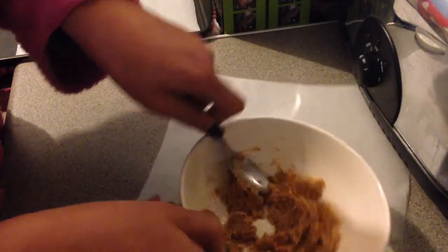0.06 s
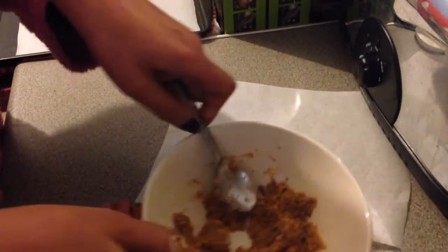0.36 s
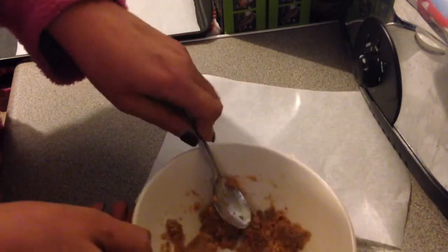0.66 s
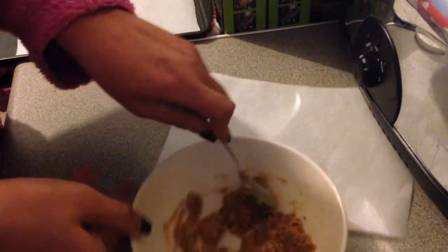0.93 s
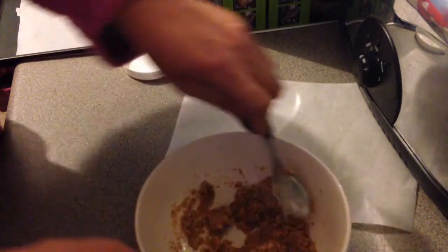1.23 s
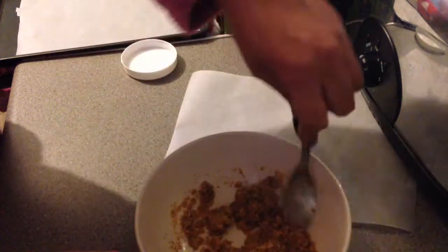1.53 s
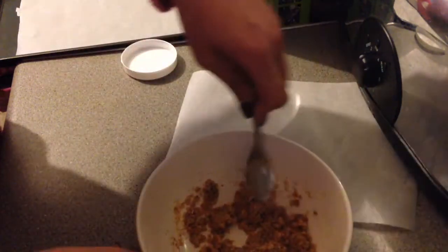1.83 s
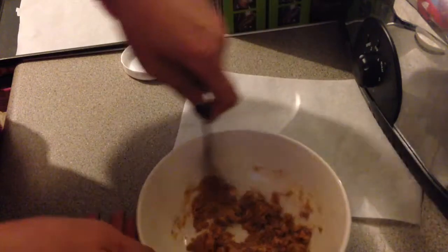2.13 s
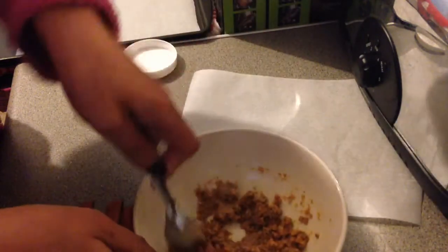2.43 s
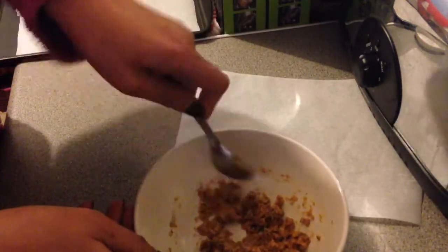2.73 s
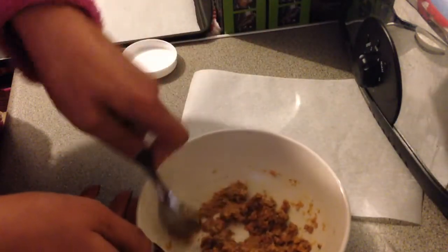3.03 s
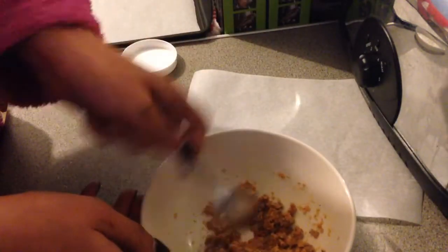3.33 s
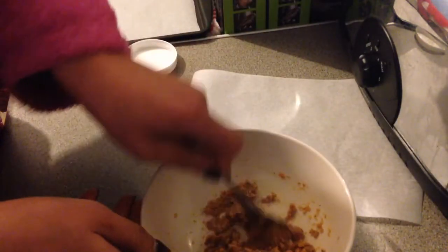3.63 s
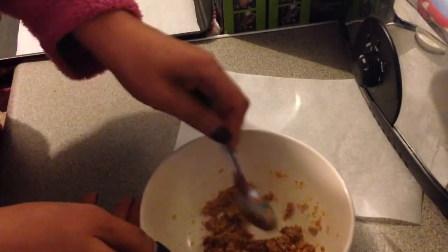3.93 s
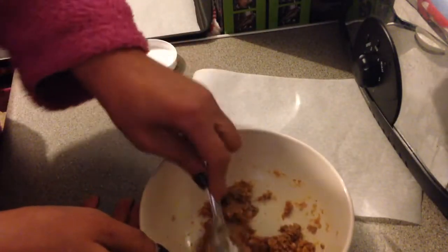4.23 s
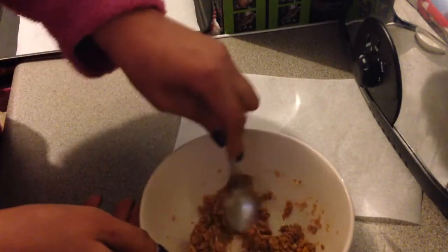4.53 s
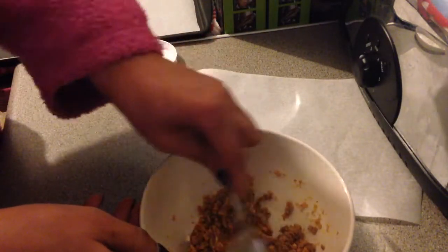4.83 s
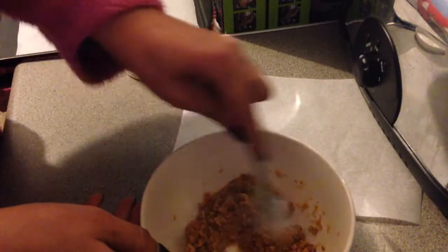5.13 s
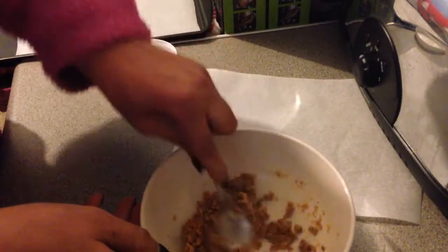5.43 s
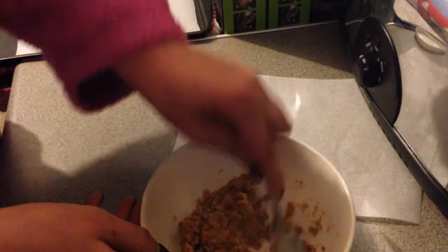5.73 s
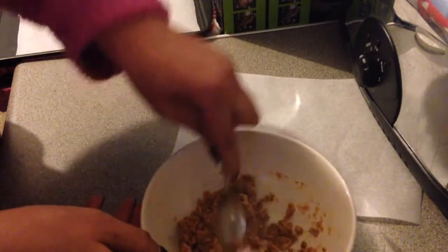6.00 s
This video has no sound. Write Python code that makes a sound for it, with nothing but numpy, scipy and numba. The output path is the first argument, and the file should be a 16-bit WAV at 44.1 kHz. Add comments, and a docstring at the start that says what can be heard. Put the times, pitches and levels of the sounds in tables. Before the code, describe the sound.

A metal spoon scrapes and clinks through thick paste in a ceramic bowl, which bumps and drags on a counter.

```python
"""Spoon mixing in a ceramic bowl

A metal spoon works a thick, crumbly mixture in a bowl on baking paper on a kitchen counter. Hits on the
wall ring spoon and bowl; stick-slip on the glaze scrapes and squeaks; the paste smears and crackles.
Shifted by hand, the bowl bumps and drags, shaking the counter. Small room, faint appliance hum, close by.
"""
import sys
import numpy as np
from scipy import signal
from scipy.fft import rfft, irfft
from scipy.io import wavfile
from scipy.ndimage import uniform_filter1d
from numba import njit

SR = 44100
rng = np.random.default_rng(int(sys.argv[2]) if len(sys.argv) > 2 else 0)


def int16_out(signal):
    """Quantize to a 16-bit WAV file."""
    q = np.round(np.clip(np.atleast_2d(signal).T, -1, 1) * 32767)
    wavfile.write(sys.argv[1], SR, q.astype(np.int16))


N = 276066
TIME = np.arange(N) / SR
RING_TIME = TIME[:SR // 3]
TOP_HZ = 15400

# bowl modes: f/Hz, level/dB, t60/s
BOWL_MODES = [(938, -3, 0.12), (2017, -8, 0.096), (2880, -20, 0.083), (3530, 1.5, 0.081), (5420, 1, 0.082),
              (5780, -13.5, 0.16), (7485, -7.5, 0.052), (9570, -4.5, 0.067), (11930, -17, 0.079),
              (14800, -13, 0.065)]
# modes of the spoon, damped against the wall: f/Hz, level/dB, t60/s
SPOON_MODES = [(1500, -20, .015), (1881, 1, 0.0075), (2324, -10, 0.038), (4160, 6, 0.02), (4660, -2, .015),
               (5400, 2.5, 0.04), (7390, -2, 0.031), (9690, -3.5, .03), (10400, -3.5, 0.027),
               (11000, -4.5, .03), (11940, -4.5, 0.019), (13500, -13.5, .03)]
# counter modes: f/Hz, level/dB, t60/s
COUNTER_MODES = [(123.2, -9.5, 0.16), (145.5, 0.5, 0.074), (193, 0.5, 0.027), (218, -9.5, 0.025),
                 (298.7, -9, 0.06), (378, -13.5, 0.17), (506, -12, 0.12), (650, -9, .05), (874, -10, 0.027)]
# spoon hits on the wall: t/s, level/dB, counter thump/dB, bowl ring/dB, rim extra/dB, spoon ring/dB,
# then 4 x tone/dB, low to high
WALL_HITS = [(1.5774, -31.5, -56, -1, -2.5, -2.5, 8.5, -4.8, -6, -11),
             (2.8310, -18.5, -42, -5.5, -1.5, 4, -3, 1.5, -4, 6.5),
             (3.552, -23, -45.5, -26.5, 12, -7.5, 1, -6, 4.5, -22),
             (4.1652, -25, -35.5, -6.5, -12.5, -5.5, -0.5, -0.35, 6.5, 3.5),
             (5.804, -30.5, -39, -2, -16.5, -2.5, 0, -5.4, -6, -14)]
# spectrum of the bowl's foot on paper: f/Hz, level/dB
RUB_SPECTRUM = [(80, -34), (250, -14), (330, 9.5), (600, -1.5), (950, -1), (1400, -12), (2200, -21),
                (4000, -53.5)]
# spectrum of paste friction: f/Hz, level/dB
PASTE_SPECTRUM = [(300, -12.5), (1400, 6), (2800, -1.5), (5400, 6.5), (6600, -1), (8000, 4), (15000, -2)]


def undb(db):
    return 10 ** (np.asarray(db) / 20)


def unit(x):
    return x / np.sqrt(np.mean(x ** 2))


def fade(t60_s):
    return np.exp(-np.log(1000) * RING_TIME / t60_s)


def ring_noise():
    return rng.standard_normal(len(RING_TIME))


def add(out, start_s, x):
    i = max(int(start_s * SR), 0)
    out[i:i + len(x)] += x[:N - i]


def colour(x, points):
    """Minimum-phase filter through (f/Hz, gain/dB) points."""
    size = 4096
    hz, db = np.transpose(points)
    bins_hz = np.arange(size // 2 + 1) * SR / size
    gain = undb(np.interp(np.log(bins_hz + 1), np.log(hz), db))
    cepstrum = irfft(np.log(gain))
    cepstrum[1:size // 2] *= 2
    cepstrum[size // 2 + 1:] = 0
    return signal.fftconvolve(x, irfft(np.exp(rfft(cepstrum))))[:len(x)]


@njit
def svf(x, hz, width_hz):
    """Band-pass with a moving centre, gain 1 there."""
    y, mid, low = np.empty(len(x)), 0., 0.
    for i in range(len(x)):
        g, damping = np.tan(np.pi * hz[i] / SR), width_hz / hz[i]
        v = (mid + g * (x[i] - low)) / (1 + g * (g + damping))
        mid, low, y[i] = 2 * v - mid, low + 2 * g * v, damping * v
    return y


def band(x, hz, width_hz):
    return svf(x, hz + np.zeros(len(x)), float(width_hz))


def ring(modes):
    """Free decay of modes."""
    return sum(undb(db) * fade(t60_s) * np.sin(2 * np.pi * hz * RING_TIME) for hz, db, t60_s in modes)


def walk(rate_hz):
    """Random levels joined by ramps, spread near 1."""
    return 1.2 * np.interp(TIME * rate_hz, np.arange(2000), rng.standard_normal(2000))


def grains(rate_hz, spread_db=0):
    """Tiny slips of uneven size at random times."""
    impulses = (rng.random(N) < rate_hz / SR) * rng.standard_normal(N)
    return unit(impulses * undb(spread_db * np.minimum(rng.exponential(size=N), 4)))


def stroke(start_s, length_s, attack_s, release_s):
    """Gain of one movement: attack, hold, release."""
    ramp = np.minimum((TIME - start_s) / attack_s, (start_s + length_s - TIME) / release_s)
    return np.sin(np.pi / 2 * np.clip(ramp, 0, 1)) ** 2


def background(air_db=-62.5, waver=0.001):
    """Room air and the slightly wavering hum of an appliance."""
    # hum lines: f/Hz, level/dB
    hum_lines = [(48.4, -78), (538.5, -78), (1911, -79)]
    # room air: f/Hz, level/dB
    air_spectrum = [(15, -45.5), (25, -12), (55, -2.5), (91, -13.5), (144, 2), (178, -6.5), (253, -10),
                    (495, -12), (537, -15), (804, -22), (1490, -22), (1850, -20.5), (2920, -21.5),
                    (14300, -23), (15500, -26)]
    warped_s = np.cumsum(1 + waver * walk(13)) / SR
    hum = sum(undb(db) * np.sqrt(2) * np.sin(2 * np.pi * hz * warped_s) for hz, db in hum_lines)
    return hum + undb(air_db) * unit(colour(rng.standard_normal(N), air_spectrum))


def kitchen(x, wet_db=-16, t60_s=0.23, gap_s=0.0073):
    """Adds the short diffuse tail of cupboards and walls."""
    tail = ring_noise() * fade(t60_s) * (RING_TIME > gap_s)
    tail = colour(tail / np.linalg.norm(tail), [(150, 11.5), (1000, 2.5), (5000, 0.5), (14000, -9.5)])
    return x + undb(wet_db) * signal.fftconvolve(x, tail)[:N]


def drags(judder_db=-2, judder_band_hz=(105, 260), rub_db=-38, drone_db=-32.5, drone_hz=141):
    """The bowl's foot judders over the paper and shakes the counter; slow slides mostly drone."""
    # shoves of the bowl: peak t/s, level/dB, rise/(dB/s), fall/(dB/s)
    shoves = [(.05, -35, 382, 119), (.66, -36.5, 260, 89), (.725, -20.5, 796, 300.5),
              (.995, -28.5, 240.5, 206), (2.04, -31, 123.5, 85), (2.305, -40.5, 300, 249.5),
              (3.28, -44.5, 216, 242), (5.835, -42, 697.5, 274)]
    gain = sum(undb(db - np.maximum(rise * (peak_s - TIME), fall * (TIME - peak_s)))
               for peak_s, db, rise, fall in shoves)
    speed = gain / gain.max()
    judder = signal.fftconvolve(grains(1200), ring(COUNTER_MODES))[:N]
    judder = unit(signal.lfilter(*signal.butter(1, judder_band_hz, "bandpass", fs=SR), judder))
    rub = unit(colour(grains(600, spread_db=2.5), RUB_SPECTRUM))
    drone = band(rng.standard_normal(N), drone_hz, width_hz=22)
    drone = unit(band(drone, drone_hz, width_hz=44))
    return (undb(judder_db) * gain * judder + undb(rub_db) * speed ** 0.82 * rub
            + undb(drone_db) * speed ** 0.74 * drone)


def thud(corner_hz, knock_db, knock_t60_s=0.055, contact_s=0.0002):
    """The foot thumps the counter through the paper; a soft landing leaves only the lowest modes."""
    knock = undb(knock_db) * fade(knock_t60_s) * unit(colour(ring_noise(), RUB_SPECTRUM))
    impact = (ring(COUNTER_MODES) + knock) * (1 - np.exp(-RING_TIME / contact_s))
    return signal.lfilter(*signal.butter(2, corner_hz, fs=SR), impact)


def bumps(rock_s=0.0225, rock_db=-16):
    """The bowl lands and rocks back, each rock weaker and duller; each clink also knocks it on the counter."""
    # landings and later rock-backs of the bowl: t/s, level/dB, low-pass corner/Hz
    impacts = [(0.054, -33, 483), (0.084, -26, 287), (0.6101, -8.5, 1250), (0.704, -13, 1010),
               (.750, -25.5, 300), (.923, -28, 990), (.956, -39, 1200), (.984, -24, 950),
               (1.942, -30, 160), (2.0201, -27.5, 1190), (2.167, -35.5, 250), (2.296, -32.5, 170),
               (3.000, -44, 200), (3.043, -42.5, 196), (4.635, -44.5, 259), (4.879, -44.5, 497),
               (4.945, -47, 300), (5.106, -44.5, 277)]
    out = np.zeros(N)
    for start_s, db, corner_hz in impacts:
        add(out, start_s, undb(db) * thud(corner_hz, knock_db=-10))
        add(out, start_s + rock_s, undb(db + rock_db) * thud(0.55 * corner_hz, knock_db=-19.5))
    for start_s, _, thump_db, *_ in WALL_HITS:
        add(out, start_s, undb(thump_db) * thud(corner_hz=1800, knock_db=-4))
    return out


def smears(patchy_db=2, smack_db=-9, smack_t60_s=0.017):
    """Paste and paper swish and crackle, with stray smacks as crumbs let go."""
    # swishes: t/s, length/s, level/dB
    swishes = [(0, 0.24, -51.5), (0.672, 0.22, -63.5), (0.928, 0.25, -60.5), (3.594, 0.17, -64),
               (3.798, 0.085, -64), (4.477, 0.082, -60), (4.842, 0.25, -67.5), (5.251, 0.32, -67),
               (5.496, 0.078, -56.5), (5.823, 0.11, -56), (5.9, 0.31, -68.5)]
    gain = sum(undb(db) * stroke(start_s, length_s, attack_s=0.019, release_s=0.59 * length_s)
               for start_s, length_s, db in swishes)
    swish = grains(3000) * undb(patchy_db * walk(56))
    smacks = signal.fftconvolve(grains(40, spread_db=-5), ring_noise() * fade(smack_t60_s))[:N]
    return gain * unit(colour(swish + undb(smack_db) * unit(smacks), PASTE_SPECTRUM))


def squeaks(scatter_cycles=0.075, third_db=-9, flutter=0.34, rim_hz=3600, lock_width_hz=250):
    """Uneven stick-slip cycles: a rough pitch, steadier when it locks to the rim's ring."""
    # an edge catches (low: foot on paper, high: spoon on glaze):
    # t/s, length/s, start f/Hz, end f/Hz, level/dB, overtone/dB
    catches = [(0.023, 0.055, 318.5, 297, -40.5, -39), (0.935, 0.12, 289.2, 336.4, -39, -25),
               (1.98, 0.15, 299.8, 325, -43, -17), (1.594, 0.033, 8600, 8100, -56, -20),
               (1.717, 0.068, 5400, 5500, -61, -10), (2.095, 0.049, 3610, 3565, -53, -23),
               (2.114, 0.26, 5580, 5440, -57.5, -13), (2.363, 0.12, 4070, 4330, -51.5, -8),
               (2.49, 0.065, 4270, 3730, -50.5, -9), (2.84, 0.038, 2540, 2785, -37.5, -3.5),
               (2.954, 0.049, 3576, 3555, -46.5, -13), (3.138, 0.061, 3715, 3530, -46, -18),
               (3.221, 0.03, 2915, 2760, -50, -4), (3.64, 0.08, 8150, 8000, -60.5, -17),
               (5.536, 0.029, 5500, 5470, -59, -15.5), (5.832, 0.081, 5730, 5550, -68, -12)]
    out = np.zeros(N)
    for start_s, length_s, start_hz, end_hz, db, overtone_db in catches:
        n = int(length_s * SR)
        lock = 0.65 * np.exp(-((end_hz - rim_hz) / lock_width_hz) ** 2)
        cycles = np.cumsum(np.linspace(start_hz, end_hz, n)) / SR
        drift = np.interp(cycles, np.arange(1000), np.cumsum(rng.standard_normal(1000)))
        phase = 2 * np.pi * (cycles + scatter_cycles * (1 - lock) * drift)
        partials = enumerate([0, overtone_db, overtone_db + third_db], 1)
        tone = sum(undb(part_db) * np.sin(k * phase) for k, part_db in partials if k * start_hz < TOP_HZ)
        grip = 1 + flutter * unit(uniform_filter1d(rng.standard_normal(n), size=100))
        add(out, start_s, undb(db) * unit(tone * grip * signal.windows.tukey(n, 0.4)))
    return out


def wandering(slips, modes, patchy_db, drift):
    """Resonances swell, fade and detune as the contact point travels."""
    out = np.zeros(N)
    for k, (hz, width_hz, db) in enumerate(modes):
        gain = undb(db + patchy_db * walk(29))
        out += (-1) ** k * gain * band(slips, hz * (1 + drift * walk(28)), width_hz)
    return unit(out)


def scrapes(body_db=-3, grit_db=-2, hiss_db=-7, chatter_db=3, unsteady_db=1.47, grit_top_hz=11000):
    """Slips on the glaze drive the bowl and a spoon resonance that moves with the contact point."""
    # sweeps along the wall: t/s, length/s, level/dB, slope/(dB/s), treble/dB, spoon start f/Hz, end f/Hz
    sweeps = [(1.705, 0.22, -60, 16, -63, 2140, 2060), (1.985, 0.59, -43.5, -21, -57, 1950, 2060),
              (2.89, 0.345, -50.5, -11, -57.5, 2005, 2140), (3.576, .145, -62.5, -40, -66, 2050, 2100)]
    # body resonances of the scrape: f/Hz, width/Hz, level/dB
    body_modes = [(1350, 480, -10.5), (2042, 34, -7), (2484, 165, 5.5), (3200, 72, 3.5), (3736, 940, 1.5),
                  (5124, 220, 1), (5330, 73, 7)]
    # high spoon resonances under grit: f/Hz, width/Hz, level/dB
    grit_modes = [(6980, 280, -4.5), (7900, 150, 2.5), (9000, 760, -5.5), (10100, 99, 13), (12200, 840, 12),
                  (13900, 940, 1)]
    gain, treble_gain, glide = 0, 0, []
    for start_s, length_s, db, db_per_s, treble_db, start_hz, end_hz in sweeps:
        contact = stroke(start_s, length_s, attack_s=0.071, release_s=0.023)
        gain += contact * undb(db + db_per_s * np.clip(TIME - start_s, 0, length_s))
        treble_gain += contact * undb(treble_db)
        glide += [(start_s, start_hz), (start_s + length_s, end_hz)]
    spoon_hz = np.interp(TIME, *np.transpose(glide)) * (1 + 0.024 * walk(30))
    slips = grains(4000, spread_db=2) * undb(1.3 * walk(90))
    body = wandering(slips, body_modes, patchy_db=3.5, drift=0.008)
    grit = wandering(slips, grit_modes, patchy_db=2.5, drift=0.022)
    grit = signal.lfilter(*signal.butter(2, grit_top_hz, fs=SR), grit)
    # more pressure, more of the spoon's low resonance
    pressure = (gain / gain.max()) ** 0.42 * undb(chatter_db * walk(25))
    spoon = band(slips, spoon_hz, width_hz=150)
    spoon = pressure * unit(band(spoon, spoon_hz, width_hz=600))
    treble = undb(grit_db) * grit + undb(hiss_db) * unit(colour(slips, PASTE_SPECTRUM))
    return undb(unsteady_db * walk(21)) * (gain * (undb(body_db) * body + spoon) + treble_gain * treble)


def ticks(bowl_db=-20, spoon_db=-14, t60_s=0.03):
    """Short clicks and knocks that barely ring bowl and spoon."""
    # taps on the glaze, and the bowl's low knock under a spoon hit: t/s, level/dB, centre f/Hz
    clicks = [(0.0944, -36.5, 5400), (0.611, -42, 2600), (0.719, -49, 5150), (2.809, -49.5, 5000),
              (3.224, -44, 5970), (4.497, -50.5, 4600), (4.5625, -53, 9100), (4.5943, -52.5, 8000),
              (4.88, -54, 1380), (4.949, -53.5, 2920), (5.079, -46, 10100), (5.387, -56, 2180),
              (5.574, -47, 6960), (5.805, -33.5, 640)]
    ringing = undb(bowl_db) * ring(BOWL_MODES) + undb(spoon_db) * ring(SPOON_MODES)
    out = np.zeros(N)
    for start_s, db, hz in clicks:
        snap = unit(band(ring_noise(), hz, width_hz=hz)) * fade(t60_s)
        add(out, start_s, undb(db) * (snap + band(ringing, hz, width_hz=2 * hz)))
    return out


def struck(modes, spread_db, detune):
    """Each contact point weights and loads the modes a little differently."""
    draws = rng.standard_normal((len(modes), 2))
    return [(hz * (1 + detune * load), db - spread_db * weight, t60_s)
            for (hz, db, t60_s), (load, weight) in zip(modes, draws)]


def clinks(crack_db=3, crack_t60_s=0.0098, rattle_db=-13, rattle_t60_s=0.091, contact_s=0.00012,
           rim_below_hz=4000):
    """Each hit rings spoon and bowl over a dense crack; hits higher on the wall ring the rim more."""
    # contact crack: f/Hz, level/dB
    crack_spectrum = [(300, -20), (900, 2), (1800, 3), (5000, -0.5), (8000, -5), (12000, -4), (15000, -11)]
    # points of the tone columns in WALL_HITS: f/Hz
    tone_hz = [1500, 4500, 7500, 11000]
    crack_decay = undb(crack_db) * fade(crack_t60_s) + undb(rattle_db) * fade(rattle_t60_s)
    onset = 1 - np.exp(-RING_TIME / contact_s)
    out = np.zeros(N)
    for start_s, db, _, bowl_db, rim_db, spoon_db, *tone_db in WALL_HITS:
        crack = unit(colour(ring_noise(), crack_spectrum)) * crack_decay
        bowl = ring([(hz, mode_db + bowl_db + rim_db * (hz < rim_below_hz), t60_s)
                     for hz, mode_db, t60_s in BOWL_MODES])
        spoon = ring(struck(SPOON_MODES, spread_db=3, detune=0.0092))
        hit = (undb(spoon_db) * spoon + bowl + crack) * onset
        add(out, start_s, undb(db) * colour(hit, [(300, -21.5), *zip(tone_hz, tone_db)]))
    return out


def scene():
    """Spoon and counter in the room, over the background; mono."""
    # bass radiation of the counter: f/Hz, gain/dB
    radiation = [(25, -23), (50, -15.5), (72, -5.5), (95, -15.5), (122, 1), (300, 0), (1000, -1.5)]
    spoon = clinks() + ticks() + scrapes() + squeaks() + smears()
    counter = colour(bumps() + drags(), radiation)
    return (kitchen(spoon + counter) + background())[None]


def record(dry):
    """Clip at full scale, then a steep low-pass."""
    lowpass = signal.ellip(8, 0.2, 70, TOP_HZ, fs=SR, output="sos")
    return signal.sosfilt(lowpass, np.clip(dry, -1, 1))


dry = scene()
out = record(dry)
int16_out(out)
```